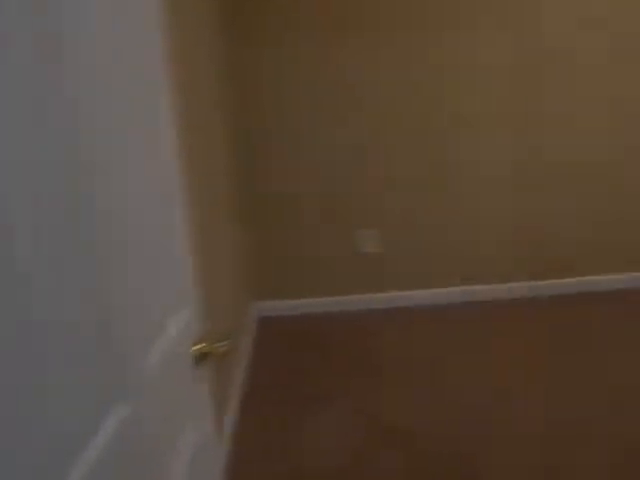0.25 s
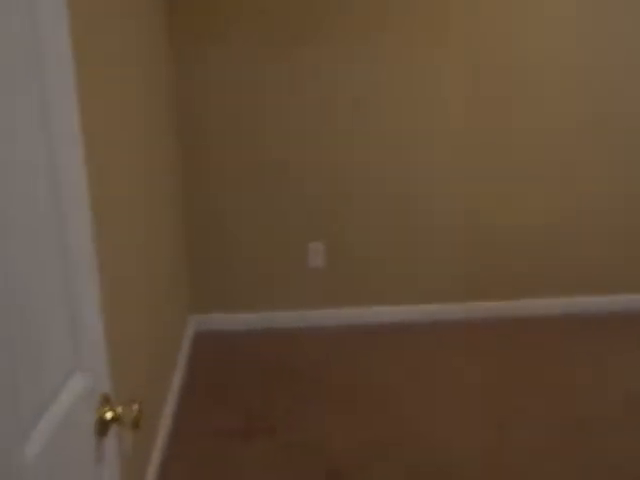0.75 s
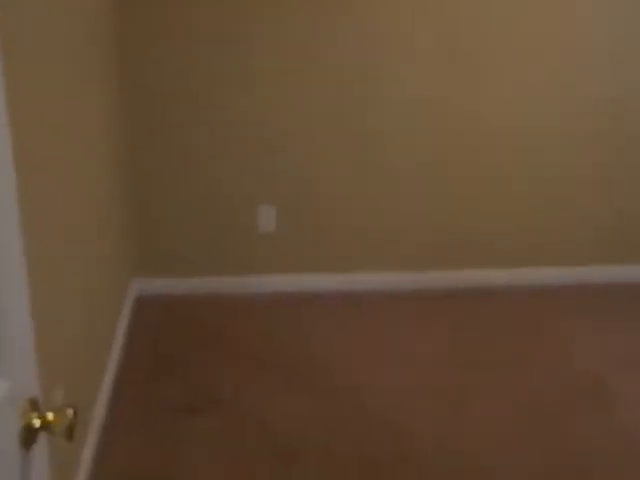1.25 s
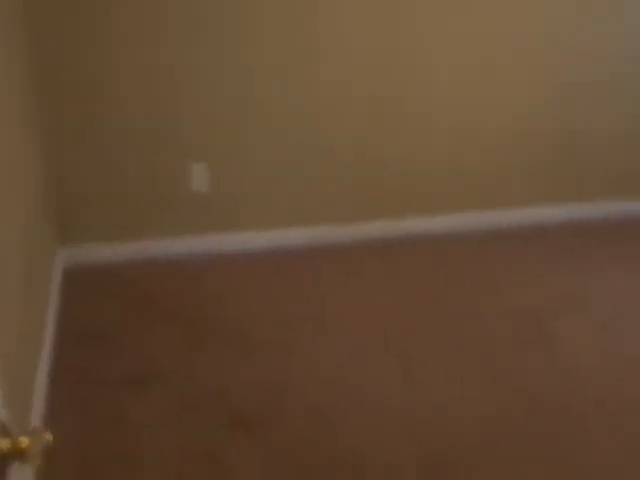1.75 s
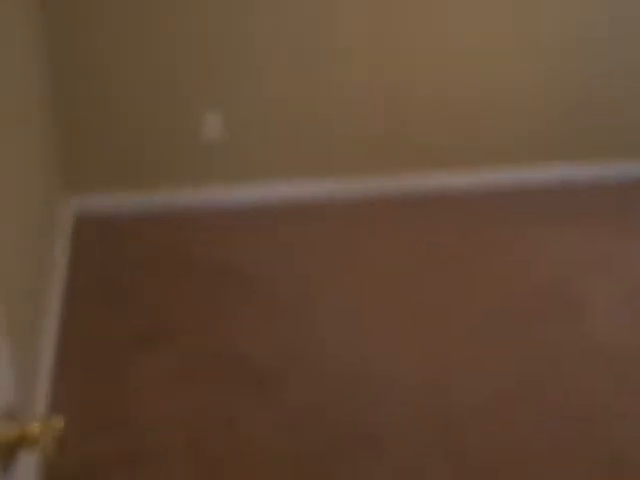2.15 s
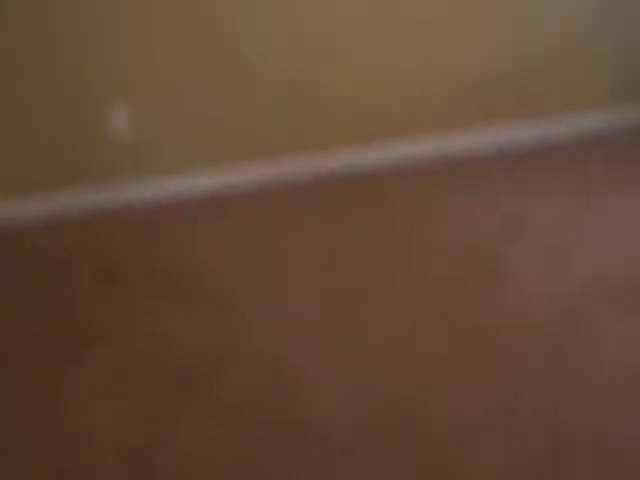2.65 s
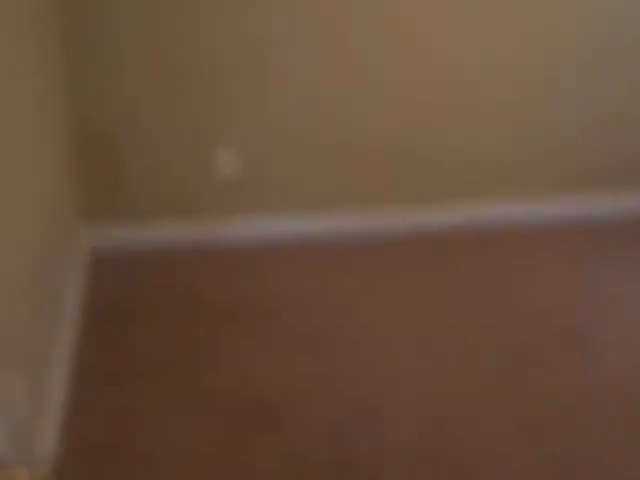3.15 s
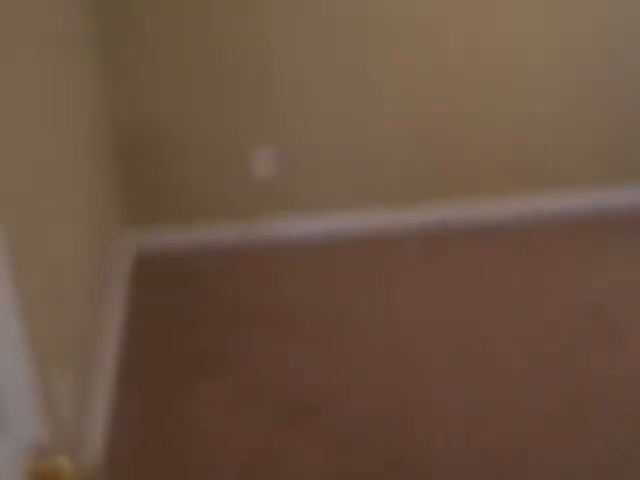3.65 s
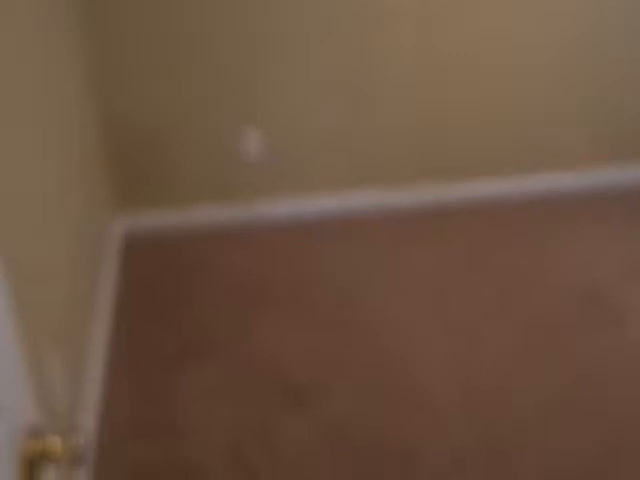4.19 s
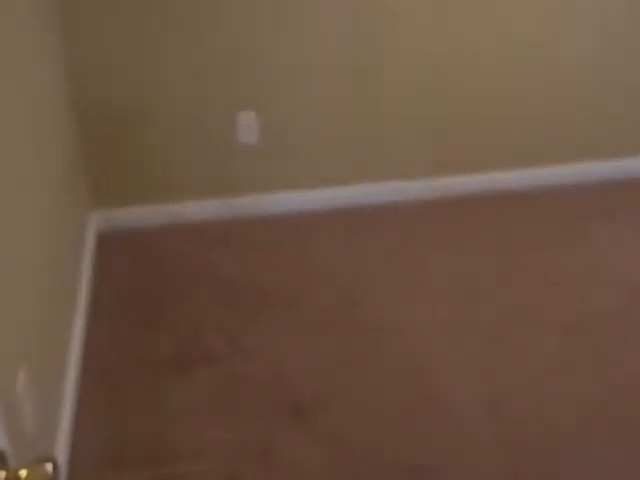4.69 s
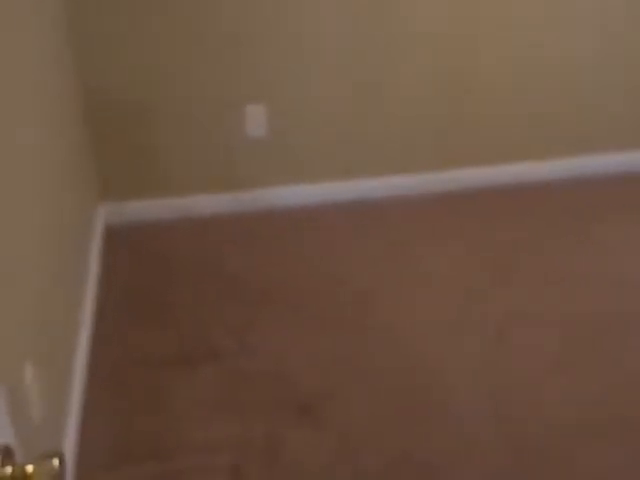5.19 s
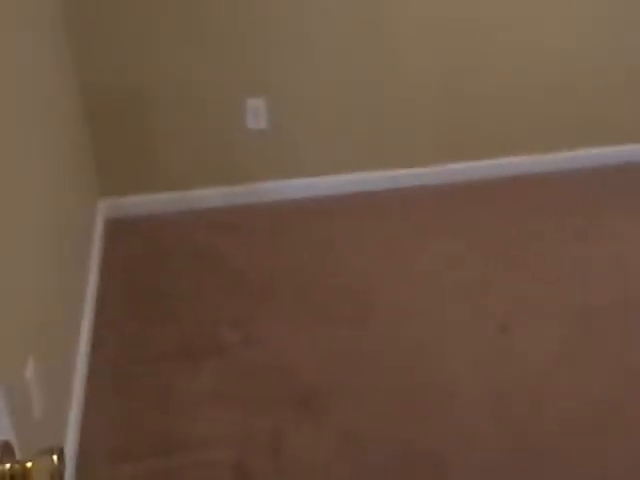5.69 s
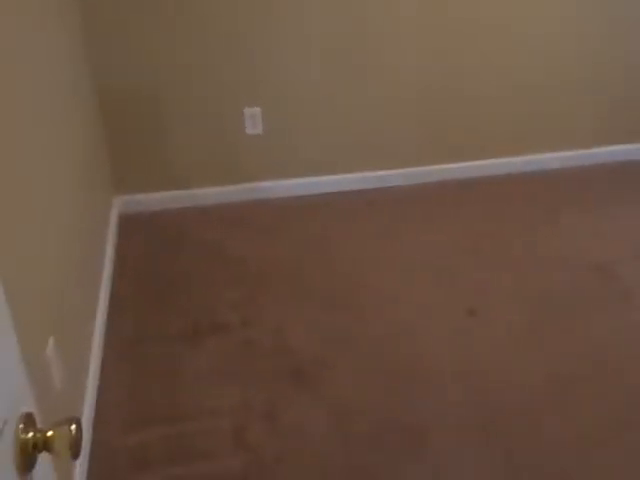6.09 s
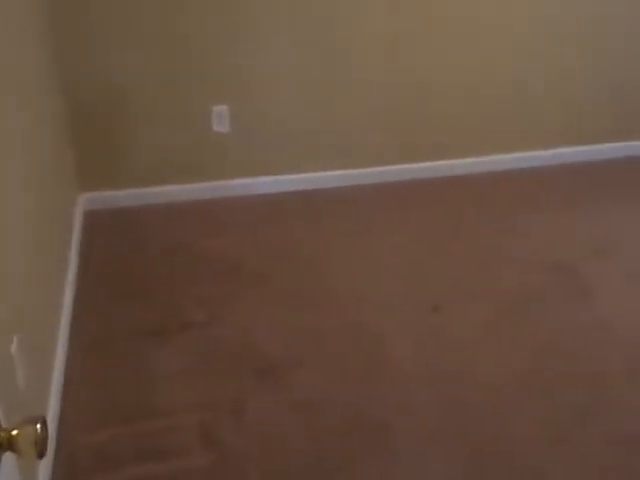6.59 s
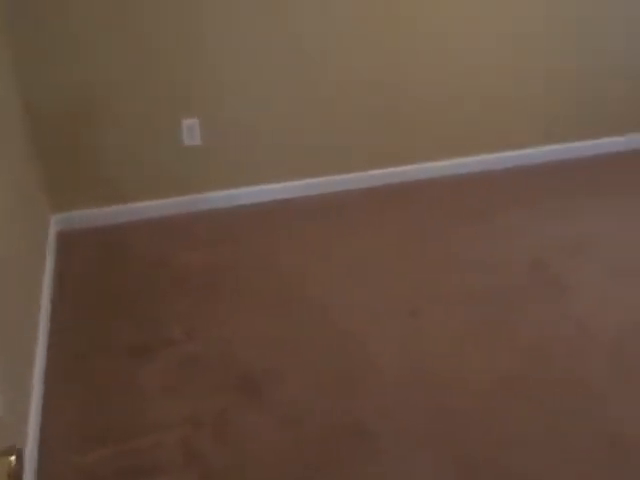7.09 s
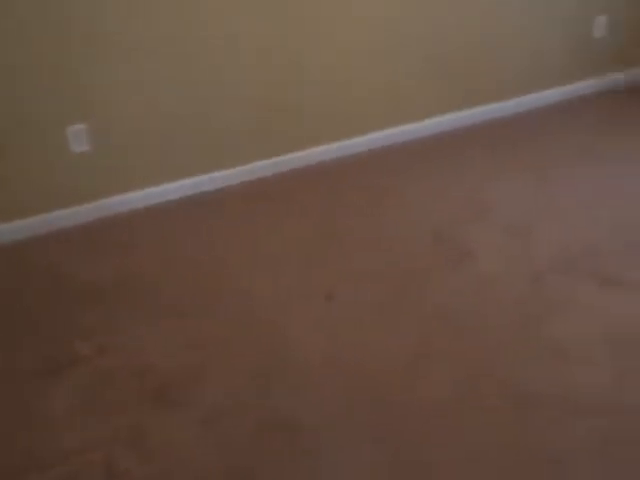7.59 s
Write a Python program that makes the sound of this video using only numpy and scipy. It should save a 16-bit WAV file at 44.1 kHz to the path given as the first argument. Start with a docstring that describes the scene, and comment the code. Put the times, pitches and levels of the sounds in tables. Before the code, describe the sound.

A door is pushed open with a knock, brushes over carpet and bumps with a hollow boom that rings through an empty room. Floorboards tick faintly and a shoe drags on the carpet. Then fingers click and rub on a handheld camera's plastic case, right at the microphone. Its lens motor whirs quietly three times among more sharp clicks, over a faint hiss.

```python
"""A door is pushed open, swings over carpet, bumps and rattles as someone steps into an empty room.
The hollow leaf rings and the bare walls boom back; boards tick underfoot and a shoe drags on the pile.
Then fingers click and rub on the plastic case of a handheld camera. Its lens motor whirs in three short
runs, gear teeth rasping, and the lens clicks on its end stop. Faint air, hiss and hum lie underneath."""
import sys
import numpy as np
from scipy import signal
from scipy.fft import rfft, irfft, next_fast_len
from scipy.io import wavfile
from scipy.ndimage import map_coordinates

SR = 44100
rng = np.random.default_rng(int(sys.argv[2]) if len(sys.argv) > 2 else 0)


def pcm_store(signal):
    """Save signal as 16-bit PCM."""
    levels = np.round(np.clip(np.atleast_2d(signal), -1, 1) * 32767)
    wavfile.write(sys.argv[1], SR, levels.astype(np.int16).T)


N = 345636
TIME = np.arange(N) / SR
AGE = TIME[:SR]  # seconds since a hit

# backward runs of the lens motor: start_s, stop_s, start_db, end_db, gear_turns_per_s
ZOOM_OUT_RUNS = [(5.645, 6.65, -47.5, -47, 37.47), (6.776, 6.98, -46.5, -49.5, 37.2)]


def amp(db):
    """Decibels to gain."""
    return 10 ** (np.asarray(db) / 20)


def unit(x):
    """Scale to rms 1."""
    return x / np.sqrt(np.mean(x ** 2) + 1e-20)


def along(points, hz):
    """Read a curve of (Hz, value) points on a log frequency axis."""
    freqs, values = np.transpose(points)
    return np.interp(np.log(hz + 1), np.log(freqs + 1), values)


def fade(t60, t=AGE):
    """A decay that loses 60 dB in t60 seconds."""
    return np.exp(-np.log(1000) * t / t60)


def filtered(x, response):
    """EQ a signal with a gain curve, response(hz)."""
    size = next_fast_len(len(x) + SR // 8)
    return irfft(rfft(x, size) * response(np.fft.rfftfreq(size, 1 / SR)), size)[:len(x)]


def low_cut(x, edge_hz):
    """Take away the bass below edge_hz."""
    return signal.sosfilt(signal.butter(3, edge_hz, "high", fs=SR, output="sos"), x)


def noise(colour, size=N):
    """Noise of rms 1 with a given spectrum."""
    return unit(filtered(rng.standard_normal(size), lambda hz: amp(along(colour, hz))))


def wobble(rate_hz):
    """A smooth random curve with rate_hz new values a second."""
    return map_coordinates(rng.standard_normal(int(N * rate_hz / SR) + 4), [TIME * rate_hz])


def pulse(colour):
    """The sharpest causal pulse with a given spectrum, peak 1."""
    spectrum = amp(along(colour, np.fft.rfftfreq(SR, 1 / SR)))
    cepstrum = irfft(np.log(spectrum))
    wave = irfft(np.exp(rfft(2 * cepstrum[:SR // 2], SR)))
    return wave / np.abs(wave).max()


def ring(modes, scatter_db=0):
    """Struck modes (pitch_hz, level_db, t60_s), their levels varied by scatter_db; peak 1."""
    wave = np.zeros(SR)
    for k, (hz, db, t60) in enumerate(modes):
        strength = (-1) ** k * amp(db + scatter_db * rng.standard_normal())
        wave += strength * fade(t60) * np.sin(2 * np.pi * hz * AGE)
    return wave / np.abs(wave).max()


def focus(x, centre_hz, octaves):
    """A contact favours the frequencies around its own pitch; rms 1."""
    return unit(filtered(x, lambda hz: 1 / np.sqrt(1 + (np.log2((hz + 1) / centre_hz) / octaves) ** 2)))


def add(track, start_s, sound):
    """Mix a sound into a track at start_s."""
    start = max(round(start_s * SR), 0)
    track[start:start + len(sound)] += sound[:N - start]


def room_tone():
    """Still air and microphone hiss, with a faint hum and a thin electronic whine."""
    # colour of the air and hiss: freq_hz, level_db
    air = [(15, -43), (25, -13.5), (93, -2.5), (131, -10), (309, -3.5), (354, -8), (404, -3.5), (501, -5),
           (543, -3.5), (811, -5.5), (903, -6), (1860, -10.5), (4380, -15), (8780, -16), (15000, -17.5)]
    # hum and whine: pitch_hz, level_db
    hum = [(409, -76.5), (12275, -78)]
    tones = sum(amp(db) * unit(np.sin(2 * np.pi * hz * TIME + 0.44 * wobble(5.6))) for hz, db in hum)
    return amp(-57.5) * noise(air) + tones


def echo(sound, near_t60, late_db):
    """Near walls answer in a quick flurry, the bare room in a longer tail."""
    # decay of the room: freq_hz, t60_s
    walls = [(150, .6), (500, 1), (1500, 1), (4000, 0.83), (12000, 0.073)]
    hz, t, bands = signal.stft(rng.standard_normal(SR), SR, nperseg=256)
    late = signal.istft(bands * fade(along(walls, hz)[:, None], t), SR, nperseg=256)[1][:SR]
    near = fade(near_t60) * rng.standard_normal(SR)
    onset = np.clip(AGE / 0.0035 - 1, 0, 1)  # pre-delay, then a quick fade-in
    tail = (amp(late_db) * late + near) * onset
    return signal.fftconvolve(sound, tail / np.linalg.norm(tail))[:SR]


def brushing(strokes, colour, grain_db):
    """Carpet pile catches and lets go under strokes that start briskly, slow down and lift off."""
    attack_s, sag_db_per_s, release_s = 0.034, 13, 0.12
    power = np.zeros(N)
    for start, stop, db in strokes:
        sag_db = sag_db_per_s * np.clip(TIME - start, 0, stop - start)
        edges = np.maximum(start - TIME, 0) / attack_s + np.maximum(TIME - stop, 0) / release_s
        power += (amp(db - sag_db) * np.exp(-edges)) ** 2
    return np.sqrt(power) * unit(noise(colour) * amp(grain_db * wobble(170)))


def shoe_drag():
    """A shoe scuffs over the carpet."""
    # scuffs: start_s, stop_s, level_db
    strokes = [(2.48, 2.64, -58.5), (2.655, 2.71, -46), (2.77, 3.06, -49)]
    # colour of the sole on the pile: freq_hz, level_db
    colour = [(71, -45), (120, -14), (312, -7), (396, -1.5), (524, -3.5), (735, -0.5), (1420, -5.5),
              (2630, -10), (3760, -12.5), (11900, -22), (14000, -25)]
    return brushing(strokes, colour, grain_db=1.5)


def door_and_floor_ticks():
    """The door is pushed open, then boards tick underfoot: short pitched knocks with a scattered snap."""
    # the door's push, then the boards: start_s, level_db, pitch_hz
    ticks = [(0.014, -24.5, 1140), (0.5678, -29, 1000), (0.5962, -38, 430), (0.826, -46.5, 1174),
             (.8835, -42.5, 2250), (1.8935, -41.5, 378), (1.9569, -41, 1190), (1.963, -47, 420),
             (3.284, -39, 522)]
    # colour of the snap: freq_hz, level_db
    snap_colour = [(50, -28), (120, -17), (200, 18), (330, 9.5), (600, 12), (1500, 9), (2300, 3.5),
                   (3400, 3), (6000, -15.5), (15000, -41)]
    ring_cycles, snap_db = 32, -2.5
    scatter = amp(-3) * fade(0.087) + amp(-17) * fade(0.62)
    out = np.zeros(N)
    for start, db, pitch_hz in ticks:
        knock = ring([(pitch_hz, 0, ring_cycles / pitch_hz)])
        snap = focus(noise(snap_colour, size=SR), pitch_hz, octaves=0.59)
        add(out, start, amp(db) * (knock + amp(snap_db) * scatter * snap))
    return low_cut(out, edge_hz=200)


def rubs():
    """Fingers and sleeve rub the case, and the shoe hisses on the carpet, in short grainy swells."""
    # swells of friction: peak_s, level_db, fall_s, brightest_hz
    swells = [(0.829, -45, 0.016, 5830), (2.68, -59, .15, 8000), (3.078, -44, 0.0091, 9000),
              (3.135, -49, 0.067, 9500), (3.293, -45, 0.021, 5000), (3.384, -44, 0.048, 6600),
              (4.898, -52.5, .027, 4500), (5.08, -51.5, 0.046, 7100), (6.269, -31, 0.0093, 7800),
              (7.065, -59, 0.027, 7000), (7.22, -58, 0.15, 9100)]
    # colour of the friction: freq_hz, level_db
    colour = [(100, -23), (600, 1), (2800, -2), (4700, -1), (7000, -6.5), (10500, -3), (12500, -12),
              (15000, -28)]
    rise_share = 0.55  # of the fall time
    grain = noise(colour) * amp(2.8 * wobble(460))
    out = np.zeros(N)
    for peak, db, fall, bright_hz in swells:
        swell = np.exp(-np.maximum((peak - TIME) / rise_share, TIME - peak) / fall)
        out += amp(db) * swell * focus(grain, bright_hz, octaves=0.74)
    return out


def motor(runs, resonances, beats, grit_db):
    """Gear teeth rasp through the lens barrel, swelling one, two and three times a turn."""
    def barrel(hz):
        return np.sqrt(sum(amp(db) ** 2 / (1 + ((hz - centre) / width) ** 2) ** 2
                           for centre, width, db in resonances))

    out = np.zeros(N)
    for start, stop, start_db, end_db, turns_per_s in runs:
        angle = 2 * np.pi * np.cumsum(turns_per_s * (1 + 0.0096 * wobble(5.1))) / SR
        load = 1 + sum(depth * np.cos(k * angle) for k, depth in enumerate(beats, 1))
        teeth = rng.standard_normal(N) * load * amp(grit_db * wobble(900))
        gate = np.clip((TIME - start) / 0.012 + .5, 0, 1) * np.clip((stop - TIME) / 0.016 + .5, 0, 1)
        level = amp(np.interp(TIME, [start, stop], [start_db, end_db]))
        out += gate * level * unit(filtered(teeth, barrel))
    return out


def lens_zoom():
    """The lens drive whirs in once and back twice, fluttering faster on the way in."""
    # forward run: start_s, stop_s, start_db, end_db, gear_turns_per_s
    zoom_in_runs = [(3.818, 4.642, -50.5, -47.5, 36.6)]
    # barrel resonances: centre_hz, width_hz, zoom_in_db, zoom_out_db
    barrel = [(1450, 330, -7, -14.5), (2150, 155, -5.5, -13), (3690, 300, -0.5, -1), (5100, 200, -16, -4.5),
              (5310, 410, -6, 2.5), (5880, 1960, -1, -2), (8660, 370, -15, -9), (9300, 600, -6.5, -6.5),
              (11440, 1100, -10, -13), (13650, 600, -13, -13.5)]
    barrel_in = [(hz, width, db) for hz, width, db, _ in barrel]
    barrel_out = [(hz, width, db) for hz, width, _, db in barrel]
    inward = motor(zoom_in_runs, barrel_in, beats=(.05, .13, .28), grit_db=1.8)
    outward = motor(ZOOM_OUT_RUNS, barrel_out, beats=(.16, .17, .07), grit_db=1.1)
    return inward + outward


def case_click(pitch_hz, octaves):
    """A contact rings the case modes near its own pitch, with a little grit and the room's answer."""
    # modes of the plastic case: pitch_hz, level_db, t60_s
    case = [(1300, -14.5, 0.012), (1980, -4.5, 0.0083), (2920, -7, 0.015), (3810, -3.5, 0.016),
            (4550, 4, 0.0073), (5340, -1, 0.0099), (6450, -2, 0.0064), (7940, 6, 0.0033), (9180, 7, 0.005),
            (9530, 3.5, 0.0052), (10680, -8.5, 0.0053), (13500, -7.5, 0.0026)]
    top_hz = 11800 * octaves ** 0.36  # a wider band reaches higher

    def touch(hz):
        band = np.exp(-.5 * (np.log2((hz + 1) / pitch_hz) / octaves) ** 2)
        return band / np.sqrt(1 + (hz / top_hz) ** 20)

    modes = ring([(hz, db + 20 * np.log10(touch(hz)), t60) for hz, db, t60 in case], scatter_db=2)
    grit = fade(0.01) * unit(filtered(rng.standard_normal(SR), touch))
    click = modes + amp(-9) * grit
    return click + amp(-21.5) * echo(click, near_t60=0.095, late_db=-19.5)


def gear_clacks():
    """Running backward, the gears clack as they engage and again when their slack is taken up."""
    # a pair of clacks per backward run: delay_s, slack_s, engage_db, take_up_db
    clacks = [(.0134, .0603, -22, -18), (0.012, .0686, -26, -25)]
    out = np.zeros(N)
    for (start, *_), (delay, slack, engage_db, take_up_db) in zip(ZOOM_OUT_RUNS, clacks):
        for lag, db in [(0, engage_db), (slack, take_up_db)]:
            add(out, start + delay + lag, amp(db) * case_click(pitch_hz=5500, octaves=1.1))
    return low_cut(out, edge_hz=280)


def camera_clicks():
    """Fingers click on the case and the lens against its end stop; each click knocks the shell."""
    # contacts of fingers and end stop: start_s, level_db, pitch_hz, width_octaves, knock_db
    contacts = [(0.7605, -38, 4200, 0.76, -29), (3.0706, -24, 13000, 1.9, -27),
                (3.1492, -12, 4300, 1.44, -45), (3.2571, -35.5, 14000, 1.6, -24),
                (3.295, -28.5, 3300, 1, -16), (3.3699, -7.5, 8300, 0.79, -52),
                (3.5032, -16.5, 9000, 1.2, -18), (3.5958, -30.5, 12000, 1.35, -30),
                (4.0351, -25.5, 11500, 1, -2.5), (4.0498, -27.5, 4950, 1.1, -20),
                (4.5884, -14.5, 9100, 1.14, -40), (4.6275, -27.5, 6200, 0.5, -34),
                (4.8889, -39, 8000, 1.8, -10.5), (5.3475, -15.5, 11000, 1.5, -16),
                (6.2585, -25, 7100, 2.3, -9), (6.284, -29.5, 6300, 1.1, -10.5)]
    # modes of the hollow shell: pitch_hz, level_db, t60_s
    shell = [(527, -1.5, 0.017), (658, 5, 0.014), (950, -10.5, 0.011), (1145, -10.5, .011)]
    lowest_hz = shell[0][0]
    tilt = 1.48  # dB per octave brighter for each dB that a knock is lighter
    out, thump = np.zeros(N), np.zeros(N)
    for start, db, pitch_hz, octaves, knock_db in contacts:
        modes = [(hz, level - tilt * knock_db * np.log2(hz / lowest_hz), t60) for hz, level, t60 in shell]
        knock = amp(knock_db) * ring(modes, scatter_db=-0.5)
        add(out, start, amp(db) * (case_click(pitch_hz, octaves) + knock))
    add(thump, start_s=3.149, sound=amp(-43) * ring([(100, 0, 0.022)]))  # a firm press thumps the mic
    return low_cut(out, edge_hz=296) + thump


def door_sweep():
    """The swinging door brushes the carpet."""
    # sweeps: start_s, stop_s, level_db
    strokes = [(0, 1, -55), (.17, 0.2, -50)]
    # colour of the door on the pile: freq_hz, level_db
    colour = [(100, -21), (220, -17), (550, -2), (1000, -7), (1550, -0.5), (1900, -6.5), (2600, -11),
              (3250, -5), (3600, -8.5), (3950, -7.5), (4500, -16.5), (7000, -21), (14000, -24)]
    return brushing(strokes, colour, grain_db=2)


def door_bumps():
    """A dull blow rings the hollow leaf, shakes the latch and booms through the room."""
    # bump and rebound: start_s, level_db, latch_db
    bumps = [(1.1617, -7.5, -50), (1.2201, -25, -33)]
    # modes of the door leaf: pitch_hz, level_db, t60_s
    leaf = [(150, -25, .3), (212, -17, .25), (289, -15, .2), (345, -3, .25), (414, -1, .2), (520, -4, .24),
            (605, -11, .25), (633, -11, .3), (745, -7, .3), (780, -11, .3), (813, -11, .3), (860, -12, .3),
            (900, -15, .28), (1000, -13, .25), (1038, -15, .25), (1224, -13, .2), (1289, -9, .22),
            (1552, -10, .2), (1717, -18, .2)]
    # colours of the blow, the walls' answer and the latch: freq_hz, level_db
    thud_colour = [(40, -63), (130, -27.5), (250, -3), (380, 13), (600, 7.5), (900, -5.5), (1350, 4),
                   (1900, -12.5), (3000, -28.5), (6000, -62), (15000, -76)]
    boom_colour = [(40, -65), (130, -17), (210, -5), (270, -8), (340, -2), (750, 1.5), (1000, -4.5),
                   (1500, -6), (2000, -17), (3000, -29.5), (6000, -42.5), (15000, -58)]
    latch_colour = [(200, -25), (1200, 4), (2300, 9.5), (3500, 3.5), (4900, 0), (6000, -6.5), (9000, -18.5),
                    (15000, -35)]
    boom_shape = (amp(-15) * fade(0.17) + amp(-26.5) * fade(1.0)) * (1 - fade(0.0077))
    latch_shape = fade(0.0096) + amp(-8.5) * fade(0.096) + amp(-16) * fade(0.59)
    out = np.zeros(N)
    for start, db, latch_db in bumps:
        blow = amp(2.5) * pulse(thud_colour) + amp(-9) * ring(leaf, scatter_db=-4)
        boom = noise(boom_colour, size=SR) * boom_shape
        latch = noise(latch_colour, size=SR) * latch_shape
        add(out, start, amp(db) * (blow + boom) + amp(latch_db) * latch)
    return low_cut(out, edge_hz=157)


def scene():
    """Door, floor, camera and room tone reach both channels alike."""
    carpet = door_sweep() + shoe_drag()
    knocks = door_bumps() + door_and_floor_ticks()
    mono = carpet + knocks + camera_clicks() + rubs() + lens_zoom() + gear_clacks() + room_tone()
    return np.array([mono, mono])


def record(dry):
    """The camera keeps nothing above its band limit."""
    top_hz, slope_width_hz = 15050, 150
    high_cut = lambda hz: np.clip((top_hz - hz) / slope_width_hz + .5, 0, 1)
    return np.array([filtered(channel, high_cut) for channel in dry])


dry = scene()
out = record(dry)
pcm_store(out)
```